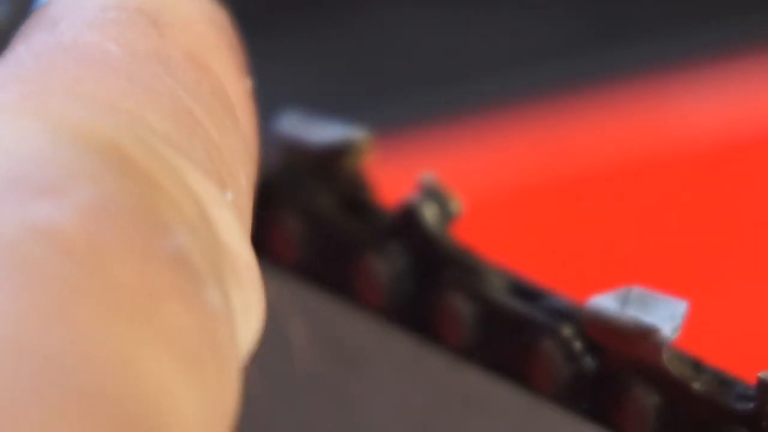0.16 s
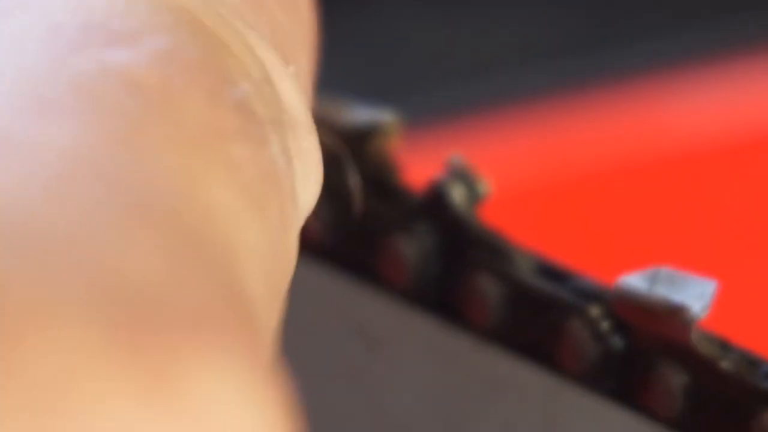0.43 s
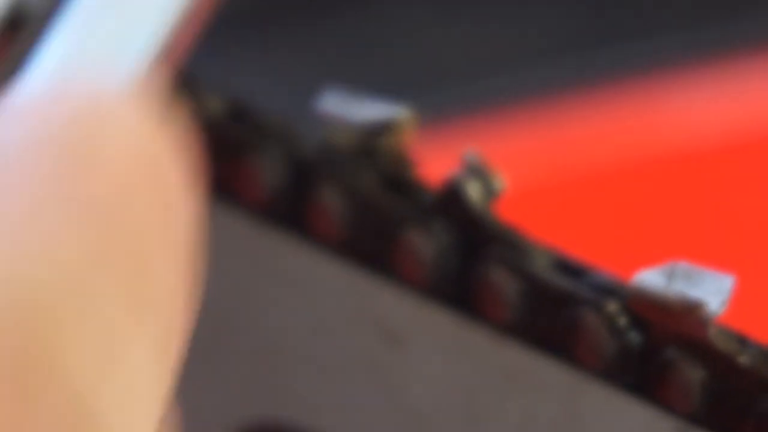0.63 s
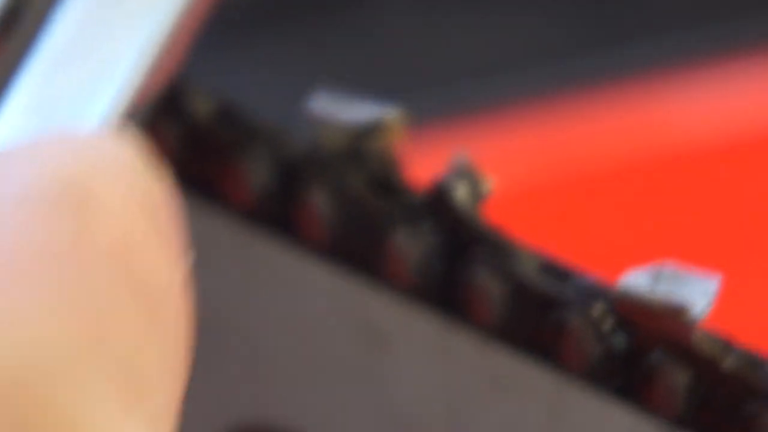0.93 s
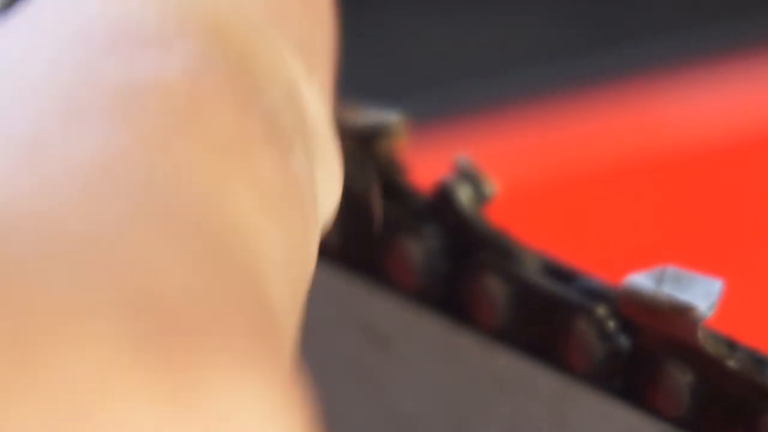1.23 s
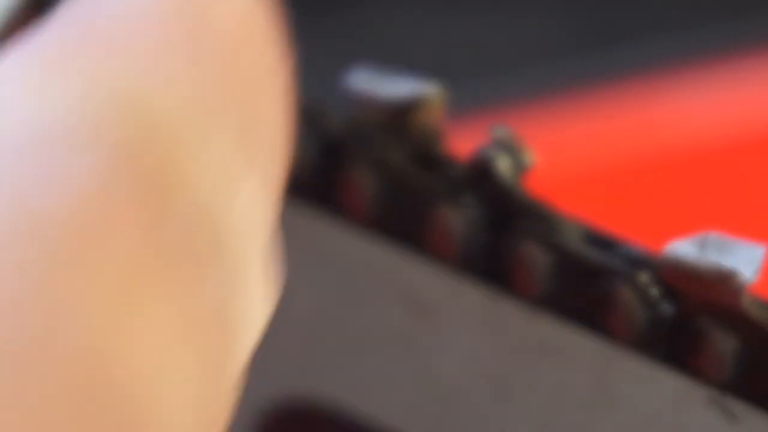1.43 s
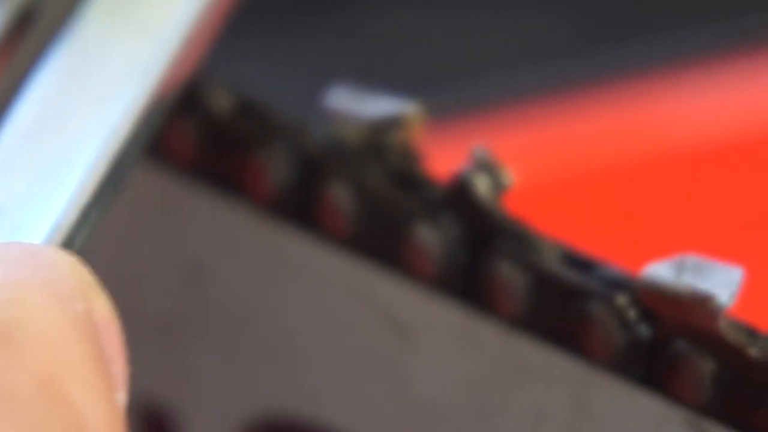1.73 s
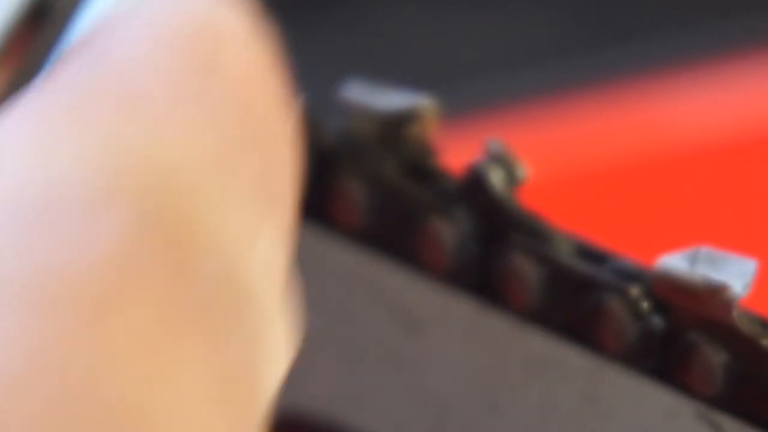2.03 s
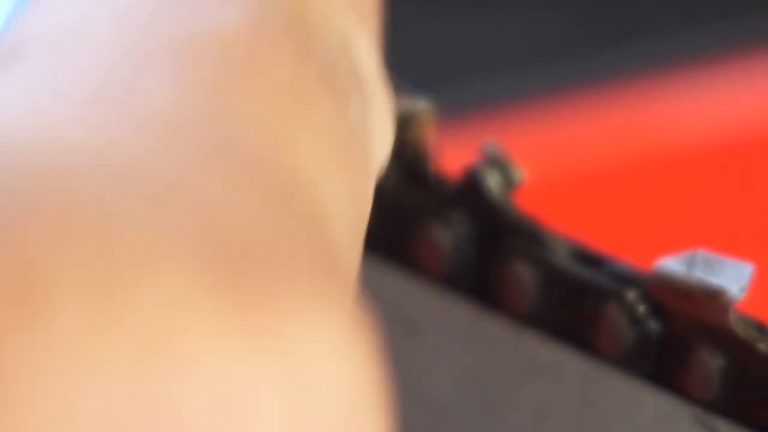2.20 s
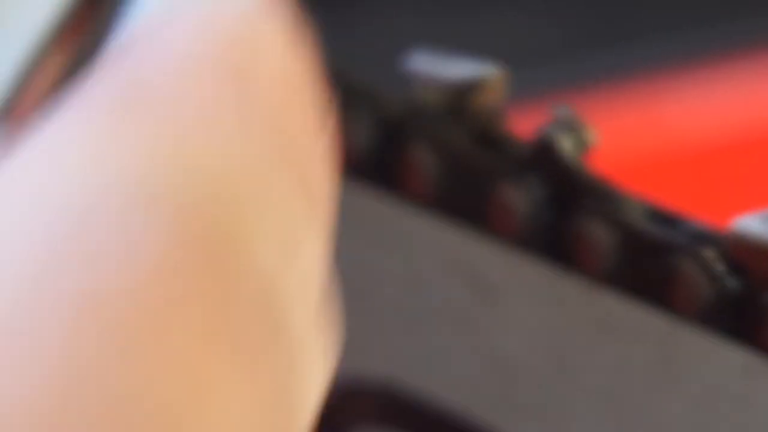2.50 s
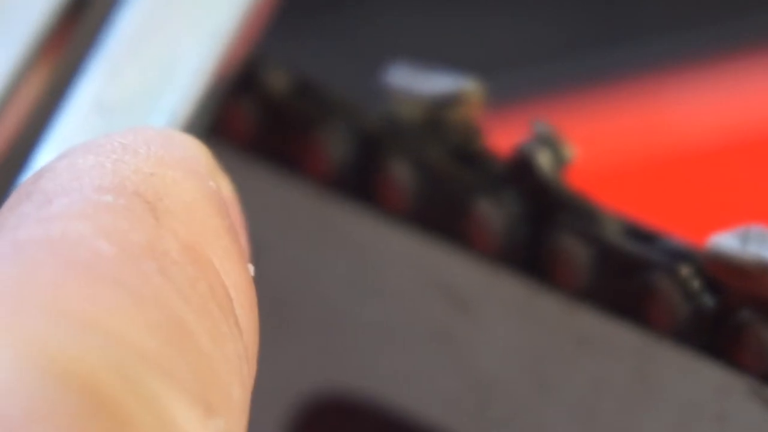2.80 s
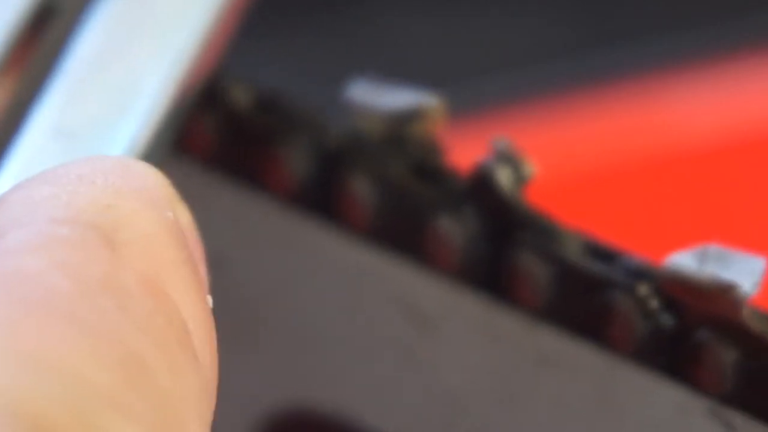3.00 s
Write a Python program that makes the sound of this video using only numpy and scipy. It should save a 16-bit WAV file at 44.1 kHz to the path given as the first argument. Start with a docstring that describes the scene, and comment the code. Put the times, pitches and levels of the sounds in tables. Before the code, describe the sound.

A round file rasps on a chainsaw tooth, close and slightly left, in a small workshop. After a light scrape and tick, three gritty pushes come at about 0.5, 1.4 and 2.4 seconds, each biting with a chatter, ringing the steel and easing off within half a second. Between them the file slides back softly with small squeaks and ticks, busiest around 2 seconds. Faint room noise lies underneath.

```python
"""First a light scrape and a tick of steel, close to a stereo microphone in a small workshop:
a round file is sharpening a saw chain tooth by hand. Three pushes bite with a chatter, rasp as tiny
chips break away and ease off, ringing the file, the cutter and the guide bar. Between them the file
slides lightly back, squeaks and ticks against the tooth. A faint hum and far noise lie below."""
import sys
import numpy as np
from scipy import signal
from scipy.fft import rfft, irfft, next_fast_len
from scipy.io import wavfile
from scipy.ndimage import uniform_filter1d

SR = 44100
rng = np.random.default_rng(int(sys.argv[2]) if len(sys.argv) > 2 else 0)


def wrap_up_sound(samples):
    """Save the sound to the file named by the first command line argument, as 16-bit audio."""
    columns = np.atleast_2d(samples).T
    # keep every value between -1 and 1, then stretch to whole-number steps
    tamed = np.clip(columns, -1, 1)
    steps = np.round(tamed * 32767).astype(np.int16)
    wavfile.write(sys.argv[1], SR, steps)


N = 138915
T = np.arange(N) / SR
SIZE = next_fast_len(N + SR // 2, True) // 2 * 2
HZ = np.maximum(np.arange(SIZE // 2 + 1) * SR / SIZE, 1)
CUTOFF_HZ = 11000


def from_db(db):
    """Decibels to gain."""
    return 10 ** (np.asarray(db) / 20)

def rms_one(x):
    """Scale to unit power."""
    return x / np.sqrt(np.mean(x ** 2) + 1e-20)

def pan(db):
    """Left and right gain; positive is to the microphone's left."""
    return from_db(np.array([[1], [-1]]) * db / 2)

def over_hz(points):
    """Join (frequency, value) points on a log-frequency axis."""
    hz, value = np.transpose(points)
    return np.interp(np.log(HZ), np.log(hz), value)

def causal(gain):
    """Minimum-phase response of a gain curve: it rings after a blow, never before."""
    cepstrum = irfft(np.log(gain + 1e-7), SIZE)
    cepstrum[..., 1:SIZE // 2] *= 2
    cepstrum[..., SIZE // 2 + 1:] = 0
    return np.exp(rfft(cepstrum))

def through(x, response):
    """Filter a signal."""
    return irfft(rfft(x, SIZE) * response, SIZE)[..., :N]

def bell(hz, width_hz):
    """Curve of one resonance, 1 at its peak."""
    return 1 / (1 + (2 * (HZ - hz) / width_hz) ** 2)

def drift(rate_hz):
    """A random swing of unit power at about the given rate."""
    return rms_one(through(rng.standard_normal(N), HZ / (1 + (HZ / rate_hz) ** 2) ** 1.8))

def swell(time_s, half_s, hz, waver_hz, db):
    """A wavering tone that comes and goes."""
    phase = 2 * np.pi * np.cumsum(hz + waver_hz * drift(22.8)) / SR
    return from_db(db) * np.exp(-((T - time_s) / half_s) ** 2) * rms_one(np.sin(phase))


# colour of the far noise: (frequency [Hz], gain [dB])
FAR_COLOUR = [(15, -62), (25, -39), (118, -21.5), (182, -19.5), (296, -11), (372, -9.5), (603, -10),
              (740, -0.5), (840, -6.5), (1030, -10), (1200, -9.5), (1550, -11), (2050, -20.5), (11000, -25),
              (14300, -70), (22000, -120)]
# its width at the microphone: (frequency [Hz], side over middle [dB])
FAR_WIDTH = [(40, -6), (130, -8), (500, -7), (1200, -2), (3000, 1.5), (11000, 1.5)]
# its slow rise and fall: (time [s], level [dB])
FAR_LEVEL = [(0, -53), (.8, -52), (1.8, -53.5), (2.8, -55.5)]
# humming bands of noise: (frequency [Hz], width [Hz], level [dB])
HUM_BANDS = [(134.4, 5.8, -79), (750, 85, -76)]
# faint far tones: (time [s], half length [s], frequency [Hz], waver [Hz], level [dB])
FAR_SWELLS = [(3.09, 0.13, 820, 32, -57.5), (3.08, 0.16, 990, 28, -59.5)]

def background():
    """Room tone: dull noise far from the microphone, a faint hum and two brief tones."""
    mid, side = through(rng.standard_normal((2, N)), from_db(over_hz(FAR_COLOUR)))
    air = rms_one(mid + through(side, from_db(over_hz(FAR_WIDTH))) * [[1], [-1]])
    air *= from_db(np.interp(T, *np.transpose(FAR_LEVEL)))
    hum = sum(from_db(db) * rms_one(through(rng.standard_normal(N), bell(hz, width)))
              for hz, width, db in HUM_BANDS)
    tones = sum(swell(*row) for row in FAR_SWELLS)
    return (air + hum + tones) * pan(db=1)


# what the walls return to the microphone: (frequency [Hz], gain [dB])
ECHO_COLOUR = [(100, -32), (500, -11.5), (2000, -2.5), (6000, -9), (11000, -15.5)]

def workshop_echoes(x, t60_s=0.25, delay_s=0.0004):
    """Near walls give a dying spray of echoes, different on each side."""
    tail = rng.standard_normal((2, N)) * from_db(-60 * np.minimum(T / t60_s, 4)) * (T > delay_s)
    tail /= np.sqrt(np.sum(tail ** 2, axis=1, keepdims=True))
    return through(x, rfft(tail, SIZE) * from_db(over_hz(ECHO_COLOUR)))


# the saw is nudged as the file takes hold: (time [s], level [dB])
SAW_NUDGES = [(.515, -55.5), (2.35, -64.5), (2.45, -64)]

def nudges(rise_s=0.014, decay_s=0.036, band_hz=(35, 180)):
    """Soft thuds of the saw on its support."""
    level = 0
    for time_s, db in SAW_NUDGES:
        age = np.maximum(T - time_s, 0)
        level += from_db(db) * np.minimum(age / rise_s, 1) * np.exp(-age / decay_s)
    low_band = signal.butter(2, band_hz, "band", fs=SR, output="sos")
    return level * rms_one(signal.sosfilt(low_band, rng.standard_normal(N)))


# tones of the saw: (time [s], half length [s], frequency [Hz], waver [Hz], level [dB])
SAW_GROANS = [(.135, .028, 201.4, 5.8, -59), (0.366, 0.052, 210, 4.4, -58.5),
              (0.521, 0.033, 193.7, 14, -53.5), (1.466, 0.031, 444, 45.7, -39),
              (2.48, 0.029, 511, 23.2, -35.5), (2.712, 0.021, 1115, 10, -56)]

def groans():
    """The saw groans and rings briefly under the file."""
    return sum(swell(*row) for row in SAW_GROANS)


# width of the steel from close by: (frequency [Hz], side over middle [dB])
STEEL_WIDTH = [(150, -28), (500, -32), (1100, -20), (2200, -5.5), (11000, -11)]

def widen(force):
    """The steel radiates from many points: middle and side become left and right."""
    mid, side = force
    return mid + through(side, from_db(over_hz(STEEL_WIDTH))) * [[1], [-1]]


# where the steel sits before the microphone: (frequency [Hz], left over right [dB])
STEEL_BALANCE = [(60, -1), (250, 2), (550, 5.5), (1100, 5), (2200, 3), (5000, 5), (8000, 5), (11000, 5)]

def steel(colour, modes):
    """Left and right gain of the ringing steel: resonances stand on a smooth colour."""
    power, pan_db = 1, over_hz(STEEL_BALANCE)
    for hz, width_hz, lift_db, side_db in modes:
        power = power + max(from_db(lift_db) ** 2 - 1, 0) * bell(hz, width_hz)
        pan_db = pan_db + side_db * bell(hz, width_hz)
    return from_db(over_hz(colour)) * np.sqrt(power) * pan(pan_db)

def chips(rough_db, rough_hz, per_s=9000, spread_db=3):
    """Stereo force of tiny chips breaking away at random, in clumps."""
    polarity, chance = rng.random((2, 2, N))
    sizes = from_db(spread_db * np.minimum(rng.exponential(1, (2, N)), 4))
    breaks = sizes * np.sign(polarity - .5) * (chance < per_s / SR)
    clumps = from_db(rough_db * drift(rough_hz))
    return widen(rms_one(breaks * clumps))

def snaps(rows, crumble_s):
    """Force of sharp clicks, each with a brief crumble."""
    force = np.zeros(N)
    for time_s, db in rows:
        force[int(time_s * SR)] = from_db(db)
    fade = np.exp(-1 / (crumble_s * SR))
    crumble = signal.lfilter([np.sqrt(1 - fade ** 2)], [1, -fade], force + 1e-18)
    return force + crumble * widen(rng.standard_normal((2, N)))

def rasp(force, levels, gain, edges_hz=(1156, 3720)):
    """Drive the steel with a force whose treble, middle and bass each follow a level."""
    above_bass, treble = (1 / (1 + (edge / HZ) ** 10) for edge in edges_hz)
    spectrum = 0
    for level, band in zip(levels, (treble, above_bass - treble, 1 - above_bass)):
        power = np.mean((gain.mean(axis=0) * band * (HZ < CUTOFF_HZ)) ** 2)
        spectrum += rfft(force * level, SIZE) * band / np.sqrt(power)
    return irfft(spectrum * causal(gain), SIZE)[:, :N]


# squeak of the lightly held file: (frequency [Hz], width [Hz], gain [dB])
FILE_MODES = [(4954, 200, 2), (5250, 240, -6.5), (5590, 220, -15)]

def file_ring():
    """Gain curve of the file's own ring."""
    return sum(from_db(db) * bell(hz, width) for hz, width, db in FILE_MODES)


# resonances of file, cutter and bar: (frequency [Hz], width [Hz], lift [dB], left over right [dB])
LOOSE_MODES = [(1140, 43, 11.5, 3), (2195, 190, 7, -3), (2596, 51, 10.5, 4), (3680, 127, 3.5, -1),
               (6100, 120, 2.5, 6), (7500, 140, 8.5, 8), (8140, 140, 9, -1), (10230, 200, 3, -3)]

def loose_steel(colour):
    """Gain of the steel while the file only rests on the tooth."""
    return steel(colour, LOOSE_MODES)


# the file taps the tooth: (time [s], strength [dB])
FILE_TICKS = [(.1013, -40), (.1158, -23.5), (.256, -38), (.291, -29), (1.1098, -25.5), (1.187, -25),
              (1.8238, -35), (1.9031, -33), (1.9415, -33), (1.9734, -21), (2.0044, -31), (2.0095, -30),
              (2.0338, -34), (2.0565, -29), (2.0748, -30), (2.0848, -26), (2.1176, -27), (2.1228, -27.5),
              (2.1416, -37), (2.1745, -33), (2.2085, -39), (2.2222, -23), (2.3299, -34), (2.6965, -37),
              (2.893, -33)]
# colour of a tap: (frequency [Hz], gain [dB])
TICK_SPECTRUM = [(100, -35), (400, -13), (2000, 1), (6500, 2.5), (8300, 8), (11000, 14.5)]

def ticks(ring_db=12.5):
    """Light touches set the loose file ringing."""
    gain = loose_steel(TICK_SPECTRUM) + from_db(ring_db) * file_ring()
    return through(snaps(FILE_TICKS, crumble_s=.0008), causal(gain))


# light strokes: (start [s], end [s], treble [dB], middle [dB], bass [dB], squeak [dB])
LIGHT_STROKES = [(0.104, 0.136, -39, -49, -44.5, -65), (0.299, 0.4, -47.5, -48.5, -54, -53.5),
                 (0.865, 0.935, -50, -57.5, -55.5, -59), (0.904, 0.991, -45.5, -52, -55.5, -47.5),
                 (1.002, 1.082, -48, -52.5, -61.5, -53.5), (1.091, 1.188, -46, -50.5, -61, -54),
                 (1.177, 1.256, -41.5, -43.5, -46, -47.5), (1.82, 1.883, -51, -62.5, -57.5, -60),
                 (1.898, 1.899, -47.5, -63, -71, -48), (1.936, 2.003, -46.5, -48.5, -62, -43.5),
                 (2.03, 2.076, -47, -47.5, -61, -53), (2.127, 2.162, -48, -48, -62, -50.5),
                 (2.217, 2.268, -51.5, -49.5, -54.5, -54), (2.343, 2.393, -51, -50, -52.5, -49),
                 (2.684, 2.704, -49.5, -62, -58, -80), (2.876, 2.918, -58, -70, -57.5, -73)]
# the file's grip, smooth at first and skipping later: (time [s], roughness [dB], attack [s])
GRIP = [(.1, 1, 0.01), (.9, 3.3, 0.018), (1.18, 2.5, 0.006), (1.85, 4, 0.005)]
# colour of the light contact: (frequency [Hz], gain [dB])
SLIDE_SPECTRUM = [(40, -22), (110, -38), (200, -3.5), (290, -16), (550, 5.5), (950, -6.5), (1500, 2.5),
                  (1900, -5.5), (3200, -3.5), (4300, 3), (5400, 4.5), (6500, 3), (7500, 4.5), (11000, 11)]

def slides(release_s=0.011, bass_release_s=0.041, pitch_wander=.015):
    """With little pressure the file skips over the tooth and squeaks."""
    times, *grip = np.transpose(GRIP)
    rough_db, attack_s = (np.interp(T, times, column) for column in grip)
    releases = np.array([[release_s], [release_s], [bass_release_s], [release_s]])
    levels = np.zeros((4, N))
    for start, end, *db in LIGHT_STROKES:
        rise = np.clip((T - start) / attack_s + .5, 0, 1)
        fall = np.exp(-np.clip(T - end, 0, .5) / releases)
        levels = np.maximum(levels, from_db(db)[:, None] * rise * fall)
    force = chips(rough_db, rough_hz=93)
    squeak = through(force * levels[-1], causal(rms_one(file_ring()))) * pan(db=4)
    slip_s = np.cumsum(pitch_wander * drift(8.9)) / SR   # the pitch shifts with the grip
    slip_s -= uniform_filter1d(slip_s, SR // 4)   # the squeak stays in step with its stroke
    squeak = np.array([np.interp(T + slip_s, T, side) for side in squeak])
    return rasp(force, levels[:-1], loose_steel(SLIDE_SPECTRUM)) + squeak


# resonances of file, cutter and bar under load:
# (frequency [Hz], width [Hz], lift at the bite [dB], lift later [dB], left over right [dB])
PRESSED_MODES = [(207.4, 11.6, 17, 12, -1), (499, 280, 6.5, 5, -4), (631.6, 19, 18, 11.5, 2),
                 (728, 58, 12, 9.5, -7), (783, 14, 16, 8, 2), (1117, 60, 5, 7.5, 5.5),
                 (1630, 210, 8, 4, -4), (2310, 230, 8.5, 5.5, -3.5), (2700, 79, 10.5, 6.5, -4),
                 (4246, 164, 14.5, -14, -4.5), (4813, 88, 14, 9.5, -6.5), (5430, 180, 4, 6, 6.5),
                 (6044, 120, 16, 3.5, -5), (8030, 200, 5.5, 4, 5), (8340, 99, 0.5, 4, -5.5),
                 (10130, 240, 7, 1, -5)]

def pressed_steel(colour, later=False):
    """Gain of the loaded steel at the bite, or later along the file."""
    modes = [(hz, width, run if later else bite, side) for hz, width, bite, run, side in PRESSED_MODES]
    return steel(colour, modes)


# passing resonances: (time [s], half length [s], frequency [Hz], width [Hz], lift [dB])
PASSING_MODES = [(.597, 0.031, 8400, 400, 5.5), (.6, .04, 4720, 180, 5.5), (.6, 0.025, 6260, 150, 5),
                 (.6, 0.023, 9900, 900, -2.5), (0.722, 0.11, 10800, 400, 0.5),
                 (1.415, 0.025, 9500, 400, 3.5), (1.395, 0.053, 8250, 800, -8),
                 (2.408, 0.025, 2030, 200, 12), (2.41, 0.1, 10860, 1400, -5)]

def travelling_contact(x):
    """Resonances swell and sink for a moment as the contact moves along the file."""
    for time_s, half_s, hz, width_hz, lift_db in PASSING_MODES:
        window = np.exp(-((T - time_s) / half_s) ** 4)
        lift = from_db(lift_db * window) - 1
        x = x + through(x * lift, 1 / (1 + 2j * (HZ - hz) / width_hz))
    return x


# the file's teeth catch on the cutter: (time [s], strength [dB])
TOOTH_CATCHES = [(.4678, -18), (.5199, -5), (.5266, -0.5), (.5349, -2), (.5584, -6), (.5702, -16),
                 (.591, 0), (.5987, -20), (.6286, -13), (1.3494, -16), (1.358, -19), (1.3645, -21),
                 (1.371, -10.5), (1.375, -11.5), (1.3798, -6), (1.396, -12), (1.4055, -16), (1.4122, -1.5),
                 (1.4813, -7), (2.3489, -17.5), (2.3596, -17), (2.3648, -16), (2.3707, -1.5), (2.375, -5),
                 (2.4216, -7.5), (2.427, -5), (2.435, -1.5), (2.4481, -3.5), (2.4655, -5), (2.4738, -3.5),
                 (2.4848, -5), (2.5771, -12)]
# colour of a catch: (frequency [Hz], gain [dB])
CATCH_SPECTRUM = [(100, -45), (300, -13.5), (700, -18), (2000, -13.5), (4500, -8), (6800, -7.5), (8300, 6),
                  (11000, 0)]

def catches():
    """A loaded file tooth snaps free and rings the steel."""
    return through(snaps(TOOTH_CATCHES, crumble_s=.0011), causal(pressed_steel(CATCH_SPECTRUM)))


# cutting strokes, one list each, before trim: (time [s], treble [dB], middle [dB], bass [dB])
CUTTING_STROKES = [
    [(0.474, -51, -55, -54), (0.506, -36, -45.5, -42.5), (0.522, -31, -37.5, -38.5),
     (0.568, -32.5, -40.5, -41), (0.592, -25.5, -36, -34.5), (0.674, -34, -49, -42),
     (0.71, -36.5, -44, -41.5), (0.722, -41.5, -47.5, -38), (0.772, -35.5, -51.5, -46),
     (0.82, -71, -62, -57)],
    [(1.335, -50.5, -82, -50), (1.351, -47, -45.5, -52.5), (1.383, -31.5, -37, -38.5),
     (1.409, -25, -32, -35), (1.437, -24, -36, -31), (1.469, -29, -38.5, -37), (1.493, -27, -39, -34),
     (1.597, -35.5, -46.5, -42.5), (1.665, -31, -45, -45), (1.72, -67, -63, -55.5)],
    [(2.379, -32, -38, -53), (2.383, -36, -42.5, -45.5), (2.415, -25.5, -37.5, -34),
     (2.451, -23.5, -31.5, -41.5), (2.463, -23.5, -35.5, -31.5), (2.483, -28, -41.5, -39.5),
     (2.553, -32.5, -42, -36.5), (2.621, -39, -49, -44), (2.647, -53.5, -61, -49), (2.68, -66, -64, -61)],
]
# colour of the cutting contact: (frequency [Hz], gain [dB])
PUSH_SPECTRUM = [(40, -33), (110, -32), (170, -17.5), (290, -6.5), (430, 0), (750, 1.5), (950, -3.5),
                 (1400, 8.5), (3000, 2.5), (5200, -6.5), (6900, -5.5), (7600, 0), (9200, 0.5), (11000, 3.5)]

def pushes(trim_db=(-1, -1, 0), bite_s=0.08, bite_fade_s=0.011):
    """Close to the microphone the file bites; its chatter quickens and smooths out, and the ring shifts."""
    chatter_hz, rise_hz_per_s, depth_db, chatter_fade_s = 125, 690, 9, 0.041
    levels, chatter_db, biting = np.zeros((3, N)), np.zeros(N), np.zeros(N)
    unevenness = np.exp(.3 * drift(80))
    for stroke in CUTTING_STROKES:
        times, *bands = np.transpose(stroke)
        inside = (T >= times[0]) & (T <= times[-1])
        age = np.maximum(T - times[0], 0)
        levels += [inside * from_db(np.interp(T, times, db) + trim) for db, trim in zip(bands, trim_db)]
        cycles = np.cumsum((chatter_hz + rise_hz_per_s * age) * unevenness) / SR
        sawtooth = 1 - 2 * (cycles % 1)
        chatter_db += inside * depth_db * np.exp(-age / chatter_fade_s) * sawtooth
        biting += inside * (1 - np.tanh((age - bite_s) / bite_fade_s)) / 2
    force = chips(rough_db=0.5, rough_hz=225) * from_db(chatter_db)
    bite = rasp(force * biting, levels, pressed_steel(PUSH_SPECTRUM))
    run = rasp(force * (1 - biting), levels, pressed_steel(PUSH_SPECTRUM, later=True))
    return bite + run


def scene(right_lag_s=.000018):
    """The filing, close by and a little left of the microphone, with the workshop around it."""
    left, right = travelling_contact(pushes() + catches()) + slides() + ticks() + groans()
    filing = np.array([left, through(right, np.exp(-2j * np.pi * HZ * right_lag_s))])
    return filing + workshop_echoes(filing) + nudges() + background()

def record(dry):
    """The microphone's signal is cut steeply at the top."""
    low_pass = np.maximum(1 / (1 + (HZ / CUTOFF_HZ) ** 180), 1e-4)
    return through(dry, causal(low_pass))


dry = scene()
out = record(dry)
wrap_up_sound(out)
```